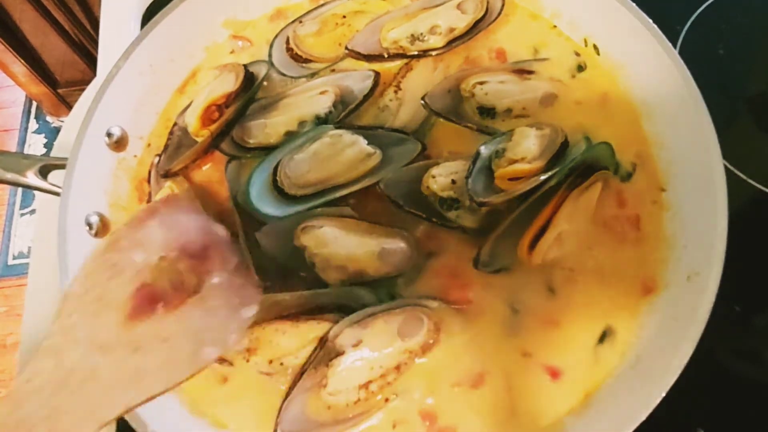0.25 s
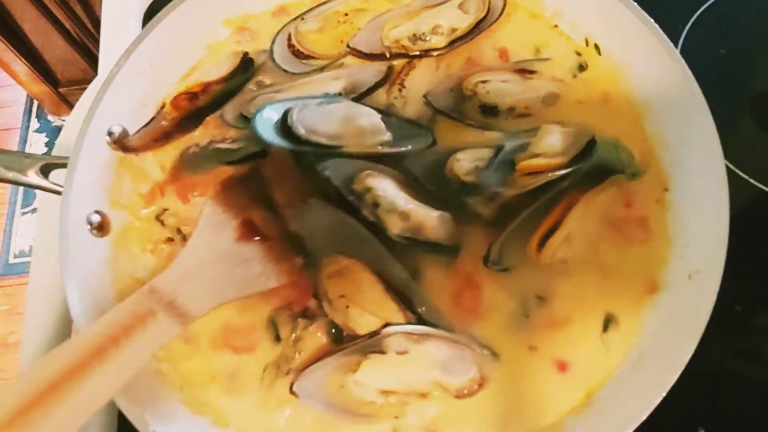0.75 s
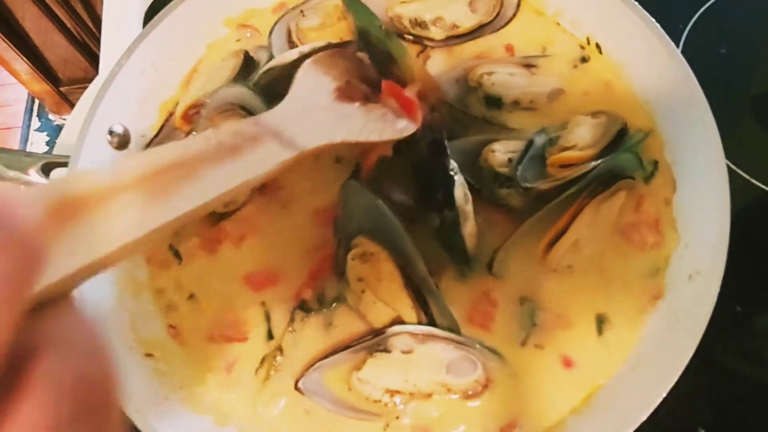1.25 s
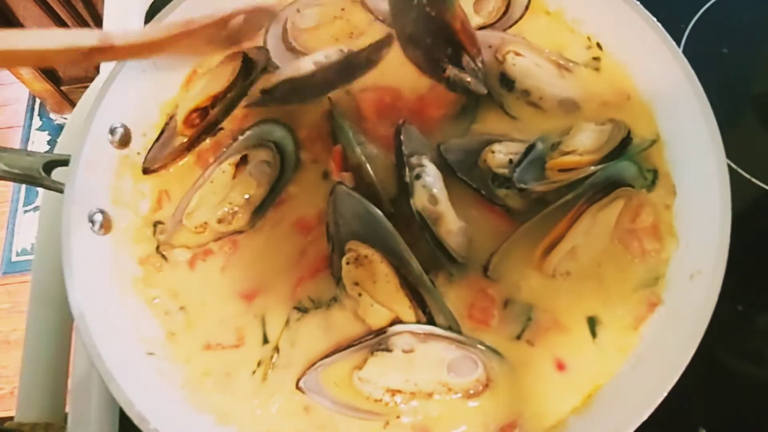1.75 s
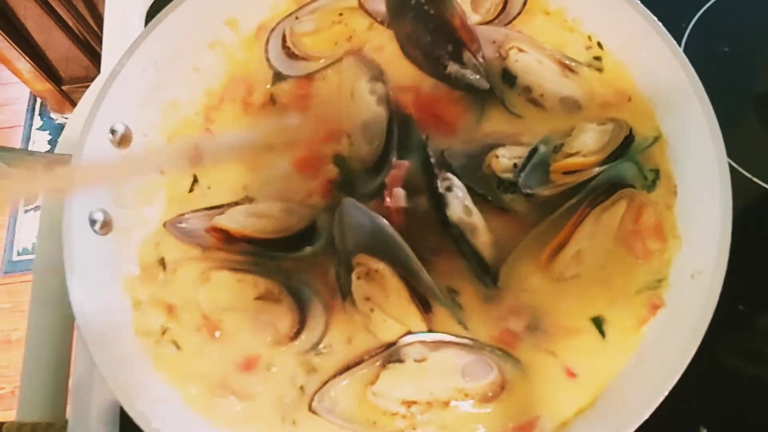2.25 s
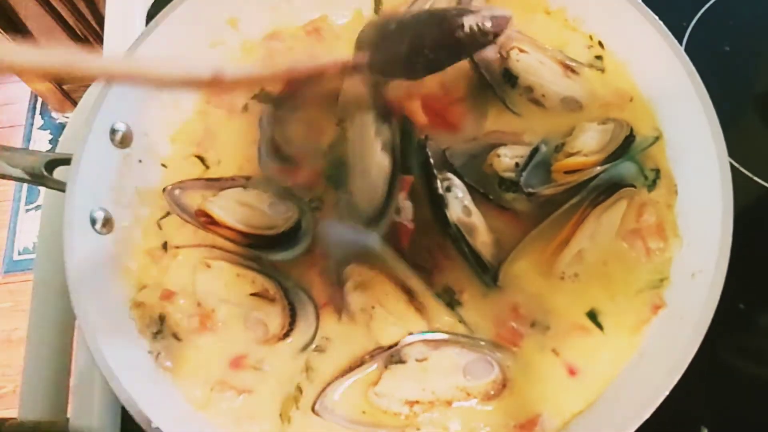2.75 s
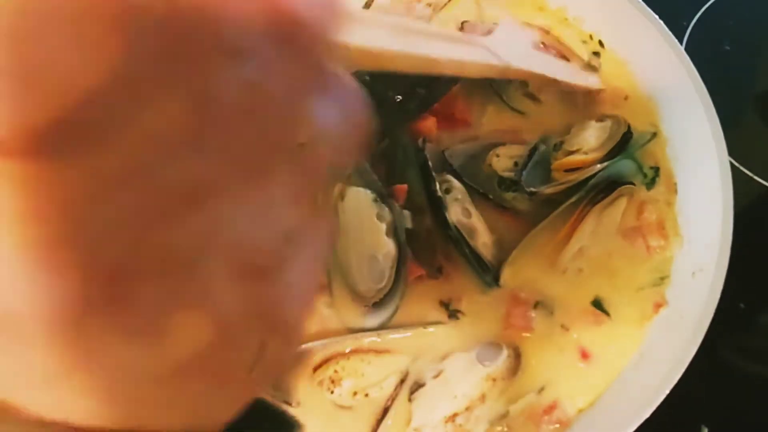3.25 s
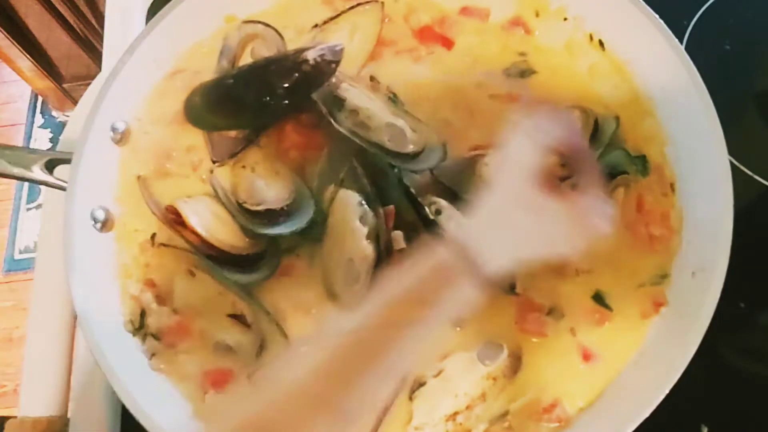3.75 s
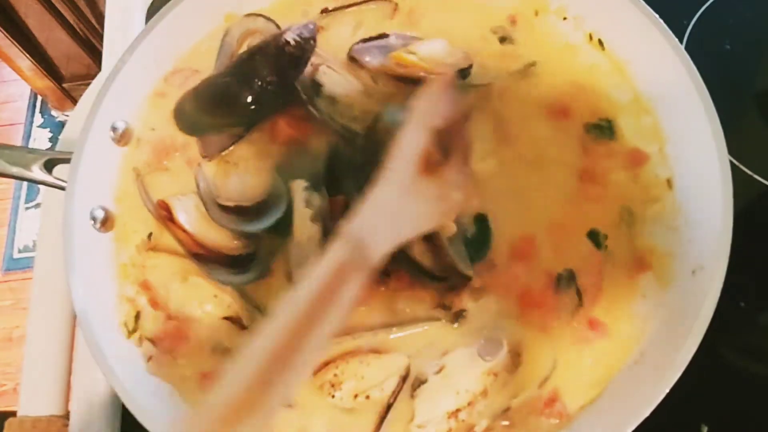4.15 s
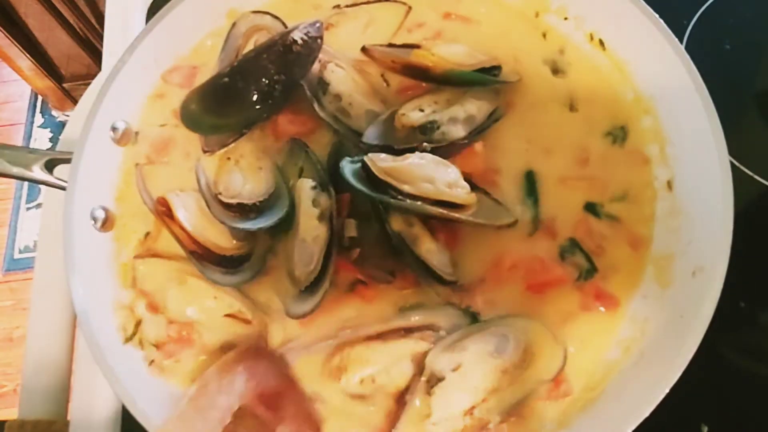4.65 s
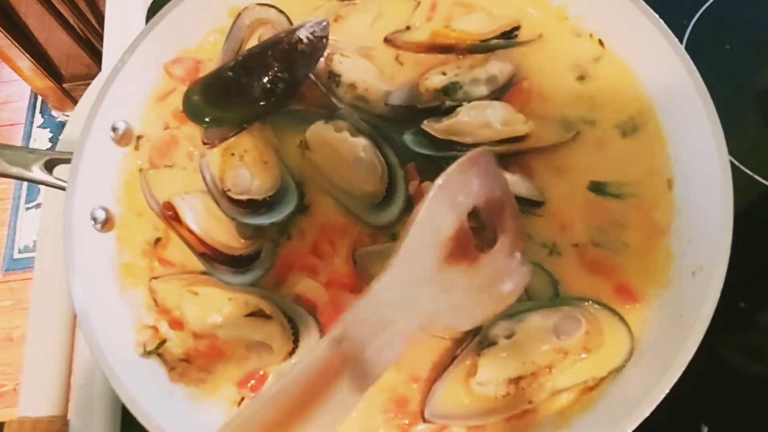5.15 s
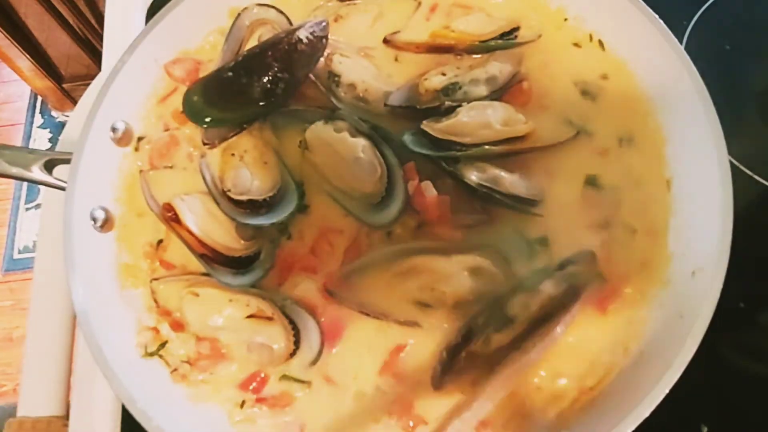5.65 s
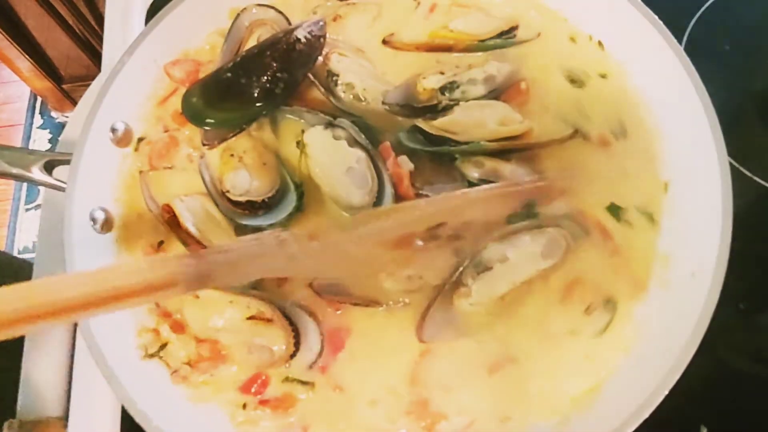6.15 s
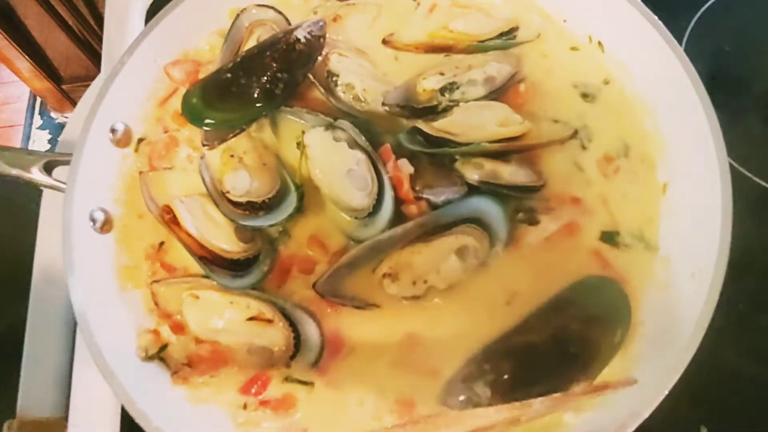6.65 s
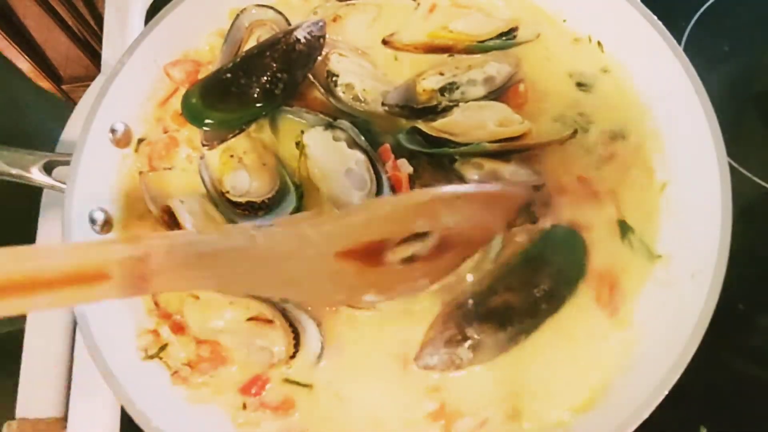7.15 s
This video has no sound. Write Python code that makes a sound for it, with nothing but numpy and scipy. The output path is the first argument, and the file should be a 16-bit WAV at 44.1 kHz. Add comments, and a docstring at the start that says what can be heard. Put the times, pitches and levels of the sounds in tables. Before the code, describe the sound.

Hard shell clicks ring a metal pan, a wooden spatula rasps briefly, and thick broth slops and fizzes while a fan hums quietly in a kitchen.

```python
"""Mussels in creamy broth are stirred with a wooden spatula in a metal pan, over an appliance's hum in a small room.
First comes a burst of shell clacks and knocks that ring the pan; damped modes, struck at once, make both.
At about 1 s and 1.3 s, then longer near 2.7 s, the spatula scrapes, as filtered grains; short rubs follow at 3.4 s.
Quieter touches and thuds go on to the end, with a thin hiss of filtered noise near 7 s.
Throughout, grains and ringing bubbles make the broth slop and fizz in waves."""
import sys
import numpy as np
from scipy import signal
from scipy.fft import rfft, irfft
from scipy.io import wavfile

SR = 44100
rng = np.random.default_rng(int(sys.argv[2]) if len(sys.argv) > 2 else 0)


def write(x):
    x = np.atleast_2d(x).T
    wavfile.write(sys.argv[1], SR, np.round(np.clip(x, -1, 1) * 32767).astype(np.int16))


N = 327222
TIME = np.arange(N) / SR
CUTOFF_HZ = 16000
MIC_LEAD_MS = 0.17   # sound from the pan reaches the left microphone first


def from_db(db):
    """Decibels to gain."""
    return 10 ** (np.asarray(db) / 20)


def rms_one(x):
    """Scale to unit power."""
    return x / np.sqrt(np.mean(x ** 2) + 1e-20)


def in_time(rows):
    """Each column of a curve at every sample."""
    s, *columns = np.transpose(rows)
    return [np.interp(TIME, s, column) for column in columns]


def at_hz(points, hz):
    """Read a table on a log-frequency axis."""
    f, value = np.transpose(points)
    return np.interp(np.log(hz), np.log(f), value)


def add(out, s, sound):
    """Mix a short stereo sound in at time s."""
    start = max(round(s * SR), 0)
    part = sound[:, :max(N - start, 0)]
    out[:, start:start + part.shape[1]] += part


def band_pass(x, low_hz, high_hz):
    """Keep the band between two frequencies."""
    return signal.sosfilt(signal.butter(2, [low_hz, high_hz], "band", fs=SR, output="sos"), x)


def drift(rate):
    """Slow random wander of rms 1, made from noise at a fortieth of the sample rate."""
    pole = np.exp(-80 * np.pi * rate / SR)
    noise = rng.standard_normal(N // 40 + 2002)
    slow = signal.lfilter([1], [1, -2 * pole, pole * pole], noise)[2000:]   # drop the filter's start
    return np.interp(np.arange(N) / 40, np.arange(len(slow)), rms_one(slow))


# how alike left and right are: (frequency [Hz], correlation [0 to 1])
SIDE_LIKENESS = [(40, 0.33), (130, 1), (300, 0.3), (700, 0.36), (2000, 0), (12000, 0.023)]


def coloured(pair, spectrum):
    """Shape two unrelated signals into stereo of rms 1, as alike left to right as the table says."""
    hz = np.maximum(np.fft.rfftfreq(N, 1 / SR), 1)
    alike = np.clip(at_hz(SIDE_LIKENESS, hz), -1, 1)
    mid, side = rfft(pair) * from_db(at_hz(spectrum, hz))
    stereo = np.sqrt(1 + alike) * mid + np.sqrt(1 - alike) * side * [[1], [-1]]
    return rms_one(irfft(stereo, N))


def grains(per_s, spread_db):
    """Two rows of random clicks of scattered size: a few stand out, or fall back if the spread is negative."""
    sizes = from_db(spread_db * np.minimum(rng.exponential(1, (2, N)), 4))
    signs = rng.choice([-1, 1], (2, N))
    present = rng.random((2, N)) < per_s / SR
    return rms_one(sizes * signs * present)


def resonate(x, hz, width_hz):
    """A resonance whose centre may move; rms 1."""
    turn = np.exp(2j * np.pi * np.cumsum(hz * np.ones(x.shape[-1])) / SR)
    ringing = signal.lfilter([1], [1, -np.exp(-np.pi * width_hz / SR)], x / turn)
    return rms_one(np.real(turn * ringing))


def strike(hz, level_db, t60, lead_ms, scatter_db, rise_s):
    """Damped modes struck at once, each reaching the two microphones with its own strength."""
    t = np.arange(int(np.clip(t60.max(), .01, .45) * SR), dtype=np.float32) / SR
    scattered_db = level_db + scatter_db * rng.standard_normal((2, len(hz)))
    gains = from_db(scattered_db) * rng.choice([-1, 1], len(hz))
    turn, loss = np.float32([2 * np.pi * hz, np.log(1000) / t60])[..., None]
    sound = []
    for gain, delay_ms in zip(np.float32(gains), (0, lead_ms)):
        age = np.maximum(t - float(delay_ms) / 1000, 0)
        ringing = gain @ (np.sin(turn * age) * np.exp(-loss * age))
        contact = 1 - np.exp(-age / rise_s)   # the contact takes a moment to build
        sound.append(ringing * contact)
    return np.array(sound) / np.sqrt(np.sum(gains ** 2))


def after(events, t60):
    """A gain kicked up by each event's level that then dies away."""
    kicks = np.zeros(N)
    for s, level_db, *_ in events:
        kicks[round(s * SR)] += from_db(level_db)
    return signal.lfilter([1], [1, -from_db(-60 / (t60 * SR))], kicks + 1e-18)


def stray(motion, db, hz, spread_db, spread_octaves, count):
    """Random small events, likelier where there is more motion: rows (time [s], level [dB], frequency [Hz])."""
    chance = np.cumsum(motion ** 2) / np.sum(motion ** 2)
    times = np.interp((np.arange(count) + rng.random(count)) / count, chance, TIME)
    size, pitch = rng.uniform(-1, 1, (2, count))
    return list(zip(times, db + spread_db * size, hz * 2 ** (spread_octaves * pitch)))


# decay of the room's tail: (frequency [Hz], time to fall 60 dB [s])
ROOM_DECAY = [(100, 0.77), (500, 0.29), (2500, 0.37), (6000, 0.2), (15000, 0.13)]
# tone of the reflections: (frequency [Hz], relative level [dB])
ROOM_TONE = [(100, -5), (400, 6.5), (1500, -4.5), (4000, 0.5), (9000, -6), (16000, 7)]


def kitchen(x, early_db=6.5, early_t60=0.042, gap_s=.002, alike_below_hz=330.0):
    """Quick reflections from pan wall and hob, then the room's tail, band by band; the bass is alike on both sides."""
    t = np.arange(SR // 2) / SR
    edges, echo = np.geomspace(60, 17000, 12), 0
    for low, high in zip(edges, edges[1:]):
        hz = np.sqrt(low * high)
        alike = 1 / (1 + (hz / alike_below_hz) ** 2)
        apart = np.sqrt(1 - alike) * rng.standard_normal((2, len(t)))
        shared = np.sqrt(alike) * rng.standard_normal(len(t))
        noise = band_pass(apart + shared, low, high)
        late = np.exp(-np.log(1000) * t / at_hz(ROOM_DECAY, hz))
        early = from_db(early_db) * np.exp(-np.log(1000) * t / early_t60)
        echo = echo + from_db(at_hz(ROOM_TONE, hz)) * noise * (late + early) * (t > gap_s)
    return signal.fftconvolve(x, rms_one(echo) / np.sqrt(len(t)), axes=1)[:, :N]


# the appliance's air rush: (frequency [Hz], relative density [dB per Hz])
RUSH_TONE = [(20, -50), (35, -44), (52, 2.5), (72, -13.5), (110, 4), (165, -4), (195, -9), (235, 0),
             (330, 0), (400, -8), (520, -8.5), (680, -10), (900, -24), (1500, -28), (3000, -42),
             (6000, -79.5)]
# its motor tones: (frequency [Hz], level before waver and swell [dB rms])
MOTOR_TONES = [(100, -59.5), (118, -65), (168, -61), (235, -65), (292.5, -53.8)]
# slow swell of rush and tones together: (time [s], gain [dB])
APPLIANCE_SWELL = [(0, -3), (1.5, 0), (3.0, 0), (4.5, -1.5), (5.3, -1.5), (6.3, 0.5), (7.42, -1)]
RUSH_DB = -52.0


def appliance(waver_db=2.2, phase_wander=0.39):
    """A fan's low rush as shaped noise, with motor tones that waver in level and phase."""
    rush = from_db(RUSH_DB) * coloured(rng.standard_normal((2, N)), RUSH_TONE)
    side_phase = np.array([[.3], [-.3]])
    tones = 0
    for hz, db in MOTOR_TONES:
        level = from_db(db + waver_db * drift(6.6))
        tones = tones + level * np.sin(2 * np.pi * hz * TIME + phase_wander * drift(3.9) + side_phase)
    swell = from_db(in_time(APPLIANCE_SWELL)[0])
    return (rush + np.sqrt(2) * tones) * swell * from_db([[-.8], [.8]])   # a little to the right


# broth pushed by the spatula: (time of the crest [s], slop level [dB], fizz level [dB],
#                               time to swell by 10 dB [s])
BROTH_WAVES = [(0.03, -57.5, -78.5, 0.84), (0.54, -60, -60, 0.05), (0.68, -57, -62, 0.15),
               (1.14, -54.5, -61.5, 0.65), (1.32, -51, -53.5, 0.03), (1.61, -59, -67, 0.4),
               (2.042, -55.5, -56, 0.14), (2.75, -55, -52, 0.17), (3.44, -57, -59.5, 0.12),
               (3.99, -57.5, -63, 0.18), (4.26, -58, -68.5, 0.06), (4.601, -59, -59, 0.06),
               (4.72, -51, -59, 0.01), (4.861, -60, -62.5, 0.08), (5.019, -54, -58, 0),
               (5.46, -53.5, -52, 0.07), (5.581, -62, -63, 0.24), (5.87, -55.5, -65, 0.01),
               (6.01, -55, -63, 0.14), (6.29, -58, -65, 0.01), (6.41, -61, -64.5, 0.05),
               (6.80, -59.5, -63.5, 0.3), (7.03, -62, -62, 0.24), (7.38, -53, -72.5, 0.09)]
EBB_S, EBB_SHARE = .045, .55   # a wave ebbs by 10 dB in this time plus a share of its swell time
SLOP_LEAD_S = 0.017   # the slop comes just before the fizz
REST_SLOP_DB, REST_FIZZ_DB = -69.0, -83.0   # the broth between waves


def waves():
    """Gain of the slop and of the fizz: every wave swells and ebbs, slow ones more slowly."""
    slop_power, fizz_power = from_db(REST_SLOP_DB) ** 2, from_db(REST_FIZZ_DB) ** 2
    for s, slop_db, fizz_db, swell_s in BROTH_WAVES:
        swell = (s - TIME) / swell_s
        ebb = (TIME - s) / (EBB_S + EBB_SHARE * swell_s)
        power = 10 ** -np.maximum(swell, ebb).clip(0, 10)
        slop_power = slop_power + from_db(slop_db) ** 2 * power
        fizz_power = fizz_power + from_db(fizz_db) ** 2 * power
    return np.interp(TIME + SLOP_LEAD_S, TIME, np.sqrt(slop_power)), np.sqrt(fizz_power)


def bubbles(per_s=100.0, cycles=26.0, count=20):
    """Small bubbles burst in the thick broth; each click rings one of a set of narrow resonances."""
    clicks, dealt = grains(per_s, spread_db=3.5), rng.integers(0, count, N)
    ringing = 0
    for k, hz in enumerate(np.geomspace(420, 2600, count)):
        own_clicks = clicks * (dealt == k) + 1e-18
        ringing = ringing + signal.lfilter(*signal.iirpeak(hz, cycles / 2, fs=SR), own_clicks) / hz
    return rms_one(ringing)


# tone of the slopping liquid: (frequency [Hz], relative density [dB per Hz])
SLOP_TONE = [(300, 17.5), (700, 10.5), (1300, 3.5), (2200, -1.5), (3500, -12), (6000, -26), (9000, -56.5)]
# tone of the fizz on the hot wall: (frequency [Hz], relative density [dB per Hz])
FIZZ_TONE = [(1500, -11), (3000, -3), (5000, -2.5), (7500, -6), (10000, -0.5), (12500, -2), (16000, -7)]
# tone of the steady simmer underneath: (frequency [Hz], relative density [dB per Hz])
SIMMER_TONE = [(2500, -2.5), (5000, -11), (8000, -9.5), (10000, 2), (13000, 7), (16000, 1)]
SIMMER_DB = -77
JOLT_DB, JOLT_T60_S = -28, 0.61   # a knock jolts the broth; level is against the knock


def broth(slop_gain, fizz_gain):
    """Waves and knocks slop the liquid as grains and bubbles; waves fizz too, over a faint steady simmer."""
    slop = coloured(grains(per_s=2500, spread_db=-3.0), SLOP_TONE) * from_db(2.0 * drift(26))
    fizz = coloured(grains(per_s=10000, spread_db=1.5), FIZZ_TONE) * from_db(2.7 * drift(30))
    simmer = coloured(rng.standard_normal((2, N)), SIMMER_TONE)
    motion = np.hypot(slop_gain, from_db(JOLT_DB) * after(PAN_KNOCKS, JOLT_T60_S))
    liquid = motion * (from_db(1.5) * slop + from_db(-6.0) * bubbles())
    return liquid + fizz_gain * fizz + from_db(SIMMER_DB) * simmer


# a thin high hiss, likely steam from under a shell
WHISTLE_S, WHISTLE_LENGTH_S = 6.95, 0.65   # middle and length
WHISTLE_HZ, WHISTLE_WIDTH_HZ, WHISTLE_DB = 13400, 600, -74


def whistle():
    """Noise through a narrow resonance swells and fades."""
    swell = np.sqrt(np.maximum(1 - (2 * (TIME - WHISTLE_S) / WHISTLE_LENGTH_S) ** 2, 0))
    hiss = resonate(rng.standard_normal((2, N)), WHISTLE_HZ, WHISTLE_WIDTH_HZ)
    return from_db(WHISTLE_DB) * swell * hiss


# grit and shell edges catch under the blade and break free in sharp ticks
GRIT_PER_S, GRIT_DB = 110, -5.5   # level is against the rasp
GRIT_LOW_HZ, GRIT_HIGH_HZ = 600, 2300


def grit():
    """Short woody ticks, all kicking the same way, reach the left microphone first."""
    clicks = -np.abs(grains(GRIT_PER_S, spread_db=3.0)[0])
    ticks = rms_one(band_pass(clicks, GRIT_LOW_HZ, GRIT_HIGH_HZ))
    return np.array([ticks, np.interp(TIME - MIC_LEAD_MS / 1000, TIME, ticks)])


# spatula pushed over the bottom: (time of hardest bite [s], time it slides on [s], rasp level [dB],
#                                  rubbing blade level [dB], blade pitch at the bite [Hz])
SPATULA_SCRAPES = [(0.99, 0.075, -46, -58, 1900), (1.315, 0.055, -58, -60, 2200),
                   (2.645, 0.04, -52, -45, 1700), (2.672, 0.05, -37.5, -47, 1500),
                   (2.712, 0.2, -33, -47, 1250), (2.822, 0.025, -52, -43, 1200),
                   (2.892, 0.026, -60, -47.5, 1100), (3.345, 0.03, -56, -58, 1000),
                   (3.376, 0.035, -56, -51, 1150), (3.449, 0.02, -50, -51, 1400),
                   (3.474, 0.03, -49, -53, 1300), (3.52, 0.02, -48.5, -52, 1240)]
# tone of wood on the wet bottom: (frequency [Hz], relative density [dB per Hz])
SCRAPE_TONE = [(180, -10), (300, -5), (403, -13), (703, -7), (869, -10), (1110, -10), (1310, -10.5),
               (1570, -7), (1970, -10.5), (2480, -9.5), (4540, -22), (8190, -35.5), (15000, -51)]
# pressure builds, eases as the blade slides, and lets go
BITE_DB_PER_S, EASE_DB_PER_S, LIFT_DB_PER_S = 380, 89, 480


def scrape(ring_db=-8.0, mode_width_hz=12.0, blade_width_hz=230.0, sag_octaves_per_s=1.9, chatter_db=2.0):
    """Wood sticks and slips: fine slips ring the damped pan, coarse ones the blade, sagging as it dips in."""
    rasp, rub = 0, np.zeros((2, N))
    catches = coloured(grains(per_s=1000, spread_db=2.0), SCRAPE_TONE) * from_db(chatter_db * drift(45))
    for s, slide_s, rasp_db, blade_db, blade_hz in SPATULA_SCRAPES:
        age = TIME - s
        contact_db = BITE_DB_PER_S * np.minimum(age, 0) - LIFT_DB_PER_S * np.maximum(age - slide_s, 0)
        rasp = np.hypot(rasp, from_db(rasp_db + contact_db - EASE_DB_PER_S * np.maximum(age, 0)))
        near = np.abs(age) < .5
        sagging_hz = blade_hz * 2 ** (-sag_octaves_per_s * age[near])
        blade = resonate(catches[:, near], sagging_hz, blade_width_hz)
        rub[:, near] += from_db(blade_db + contact_db[near]) * blade
    slips = coloured(grains(per_s=2000, spread_db=2.5), SCRAPE_TONE) * from_db(1.2 * drift(57))
    body = 0
    for hz, *_ in PAN_MODES:
        if hz > 500:
            body = body + signal.lfilter(*signal.iirpeak(hz, hz / mode_width_hz, fs=SR), slips)
    texture = from_db(-1.5) * slips + from_db(ring_db) * rms_one(body) + from_db(GRIT_DB) * grit()
    return rasp * texture + rub


# wet films snapping between shells: (time [s], level [dB], centre pitch [Hz],
#                                     spread of its pitches [natural log of frequency])
FILM_SMACKS = [(0.4192, -26, 6500, 0.18), (0.681, -35.5, 10650, .15), (0.786, -44, 8950, 0.11),
               (2.345, -47, 7000, 0.29), (2.58, -21, 12400, .13), (3.411, -43, 6800, .25),
               (3.508, -36.5, 10600, .15), (4.1016, -42, 9940, .13), (4.7074, -26, 10300, .28),
               (4.719, -34, 8400, 0.21), (4.759, -35.5, 8100, .1), (4.8025, -43, 6500, .5),
               (4.817, -43, 9000, .08), (4.8649, -41, 10100, .13), (4.9945, -36.5, 9900, .2),
               (5.362, -36.5, 9200, .3), (5.384, -37, 8900, 0.32), (6.792, -44, 10000, .15),
               (6.851, -44, 10000, .3), (6.881, -44, 10500, .08), (6.8904, -40, 10500, 0.18),
               (6.8985, -36, 5600, 0.2), (7.395, -38, 9550, 0.13)]
SMALL_SMACK_DB, SMALL_SMACK_HZ = -47.5, 9800.0   # middle of the random small ones


def smacks(motion, t60=0.0069, small_width=0.13, count=40):
    """A snapping film gives a tiny high tick: a cluster of random, quickly damped pitches."""
    out = np.zeros((2, N))
    ticks = stray(motion, SMALL_SMACK_DB, SMALL_SMACK_HZ, spread_db=1.0, spread_octaves=0.18, count=18)
    small = [(*tick, small_width) for tick in ticks]
    for s, level_db, hz, width in FILM_SMACKS + small:
        pitches = np.minimum(hz * np.exp(width * rng.standard_normal(count)), CUTOFF_HZ)
        smack = strike(pitches, 0, np.full(count, t60), lead_ms=0.1015, scatter_db=1.5, rise_s=0.00015)
        add(out, s, from_db(level_db) * smack)
    return out


# after a knock the pan rocks on the hob in its lowest modes
ROCK_DELAY_S, ROCK_DB, ROCK_BELOW_HZ = .014, -14.5, 87
ROCK_RING = 1.4   # times the mode's own ring time


def rocking():
    """The heavy pan settles on the hob just after each knock, sounding its lowest modes."""
    out = np.zeros((2, N))
    hz, mode_db, t60 = np.transpose([mode for mode in PAN_MODES if mode[0] < 2 * ROCK_BELOW_HZ])
    weight_db = -10 * np.log10(1 + (hz / ROCK_BELOW_HZ) ** 6)
    for s, level_db, low_hz, *_ in PAN_KNOCKS:
        push = 1 / (1 + (low_hz / (2 * ROCK_BELOW_HZ)) ** 2)   # deep thuds move it most
        rock = strike(hz, mode_db + weight_db, t60 * ROCK_RING, lead_ms=MIC_LEAD_MS, scatter_db=1.5,
                      rise_s=0.003)
        add(out, s + ROCK_DELAY_S, push * from_db(level_db + ROCK_DB) * rock)
    return out


# knocks that reach the pan: (time [s], level [dB], lowest frequency excited [Hz], highest frequency excited [Hz],
#                             ring time [share of the free one], mode that the spot favours [Hz])
PAN_KNOCKS = [(0.4216, -19, 296, 5550, 0.88, 4002), (0.4225, -34, 750, 950, .8, 845),
              (0.523, -24, 150, 480, 0.7, 345), (0.5933, -33, 1500, 2500, 1.6, 2038),
              (0.6172, -25, 1150, 4700, 0.85, 4735), (0.682, -28.5, 247, 1370, 0.5, 925),
              (0.9679, -41, 250, 2980, 1.9, 305), (1.030, -31.5, 230, 895, 0.61, 425),
              (1.36, -36.5, 119, 250, 1.7, 148), (1.4049, -34.5, 201, 720, 1.8, 305),
              (1.778, -23, 130, 406, 1.08, 224), (1.7785, -37, 700, 1600, .8, 845),
              (2.0122, -45, 200, 616, 0.76, 305), (2.502, -28, 150, 606, 0.74, 224),
              (2.5129, -24, 109, 900, 0.84, 719), (2.533, -24.5, 110, 300, 0.45, 148),
              (2.7287, -24.5, 220, 2250, 0.5, 719), (3.2113, -31.5, 80, 428, 0.87, 104),
              (3.83, -29.5, 100, 326, 1.46, 148), (4.5568, -34, 130, 395, .6, 224),
              (4.5811, -33.5, 500, 4700, 0.62, 845), (4.7079, -33, 220, 900, 0.5, 305),
              (4.993, -35, 200.5, 704, 0.56, 512), (5.361, -42, 350, 6000, 0.5, 512),
              (5.365, -26, 130, 357, 0.42, 246), (5.386, -39.5, 450, 7000, 0.47, 5660),
              (5.395, -31, 220, 700, .6, 512), (6.2679, -31, 198, 813, 0.2, 305),
              (6.7037, -27, 170, 480, 0.4, 425), (6.747, -32.5, 69.3, 300, 0.53, 246),
              (6.791, -26, 70, 400, 0.62, 104), (7.3399, -38.5, 109, 300, 1, 172)]
# modes of the loaded pan on the hob: (frequency [Hz], relative level [dB], free time to fall 60 dB [s])
PAN_MODES = [(46, -12, .4), (60, -10, .35), (82, -8, .25), (104, -6, .2), (122, -7, .2), (148, -2, .28),
             (172, -8, .15), (224, -3.5, .2), (246, -5, .14), (305, -5, .15), (345, -6, .13),
             (425, -7, .12), (512, -4, .15), (590, -9, .12), (719, -7, .14), (845, -4, .22),
             (925, -10, .13), (1130, -12, .14), (1383, -2, .32), (1540, -14, .16), (1722, -7, .34),
             (1950, -9, .14), (2038, -8, .26), (2335, -14, .16), (2450, -10, .24), (2530, -10, .25),
             (2660, -12, .18), (2905, -13, .2), (3000, -16, .22), (3290, -14, .2), (3370, -11, .2),
             (3600, -16, .2), (3945, -12, .12), (4002, -5.5, .36), (4735, -13.5, .29), (5160, -14, .12),
             (5660, -11, .18), (6585, -11, .15), (7480, -16, .14)]
# between the main modes lies a dense bed of weak ones: dB at 1 kHz, fall in dB per octave, free t60 in s
BED_DB, BED_FALL_DB, BED_T60_S = -17.5, 0.5, 0.21


def pan(contact_cycles=0.24, favour_db=5.5, count=70):
    """Soft wood wakes the low modes, a hard shell edge the high ones; a spatula left in contact damps them."""
    out = np.zeros((2, N))
    bed_hz = np.geomspace(330, 8000, count) * np.exp(rng.uniform(-.02, .02, count))
    bed = [(hz, BED_DB - BED_FALL_DB * np.log2(hz / 1000), BED_T60_S) for hz in bed_hz]
    hz, mode_db, t60 = np.transpose(PAN_MODES + bed)
    for s, level_db, low_hz, high_hz, free, spot_hz in PAN_KNOCKS:
        contact_db = -10 * np.log10((1 + (low_hz / hz) ** 4) * (1 + (hz / high_hz) ** 6))
        # each spot on the pan favours other modes
        nearest = np.argmin(np.abs(hz[:len(PAN_MODES)] - spot_hz))
        favoured = np.arange(len(hz)) == nearest
        spot_db = rng.normal(0, 1, len(hz)) + favour_db * favoured
        # shifting broth detunes the low modes
        load = np.exp(rng.normal(0, 0.013, len(hz)) / (1 + (hz / 700) ** 2))
        knock = strike(hz * load, mode_db + contact_db + spot_db, t60 * free, lead_ms=MIC_LEAD_MS,
                       scatter_db=2.5, rise_s=contact_cycles / high_hz)
        add(out, s, from_db(level_db) * knock)
    return out


# tone of the jostled shells: (frequency [Hz], relative density [dB per Hz])
RATTLE_TONE = [(300, -10), (700, 2), (1800, 4.5), (3200, -3), (5500, -6.5), (9000, -11.5), (15000, -20)]


def rattle(share_db=-36.5, t60=0.36, hard_above_hz=1250.0):
    """A hard clack jostles the neighbouring shells, which settle in a quick run of tiny contacts."""
    hard = [clack for clack in SHELL_CLACKS if clack[2] > hard_above_hz]
    contacts = coloured(grains(per_s=3400, spread_db=2.5), RATTLE_TONE)
    return from_db(share_db) * after(hard, t60) * contacts


# shell against shell or spatula: (time [s], peak level before the mix [dB], main resonance [Hz],
#   fall above it [dB per octave], time to fall 60 dB of modes near it [s], left minus right [dB])
SHELL_CLACKS = [(0.4219, -18.5, 4300, 7, 0.0069, 4), (0.4738, -17.5, 6800, 12, 0.0045, 5),
                (0.4745, -9, 2900, 14, 0.0042, 5), (0.4748, -11, 3800, 16, .005, 5),
                (0.5915, -30.5, 2400, 10, 0.035, -4), (0.6167, -22, 1940, 8.5, 0.026, -1),
                (0.6189, -21.5, 4220, 24, 0.017, -5), (0.653, -28.5, 1300, 11, 0.013, 0),
                (.6815, -28, 850, 8, 0.016, 3), (0.8748, -35, 2900, 26, 0.003, 1),
                (0.8752, -37, 1200, 12, .005, 1), (0.968, -11.5, 4750, 14, 0.008, -0.5),
                (0.9694, -20, 2130, 7, 0.0063, 5), (1.030, -32.5, 1560, 4.5, 0.062, 2),
                (1.231, -41, 1550, 20, .012, 0), (1.3011, -29, 1760, 9, 0.032, 0),
                (1.3591, -31, 2610, 6, 0.018, -2.5), (1.404, -21.5, 1500, 25, 0.0069, -1),
                (1.5772, -26.5, 1370, 6.5, 0.015, 2.5), (1.778, -26, 1080, 14.5, 0.0085, 0),
                (1.868, -42, 1170, 25, 0.025, 1), (2.0119, -31.5, 1040, 14, 0.033, 1),
                (2.0963, -38.5, 1090, 4.5, .02, 1.5), (2.511, -23.5, 790, 3, 0.015, 2),
                (2.5114, -26, 3700, 24, .012, 0), (2.5114, -28, 2400, 22, .06, 0),
                (2.58, -30, 2590, 9.5, 0.036, -3), (2.6845, -26, 1500, 8, .005, 0),
                (2.701, -20.5, 1150, 14, .004, 1), (2.7296, -14, 1000, 11, 0.012, -.5),
                (2.7318, -21, 2100, 20, .008, 0), (2.749, -25, 1500, 10, .006, 0),
                (2.82, -29, 1180, 12, .02, -4), (2.8435, -29.5, 1200, 12.5, .008, -2),
                (3.2115, -31, 1560, 12, 0.0043, 2), (3.3728, -39, 1400, 16, .008, 0),
                (3.3795, -37, 1150, 16, .006, 0), (3.4015, -39, 1300, 12, .006, 0),
                (3.449, -36, 1395, 17, .01, 0), (3.4755, -34, 1400, 9, .003, 0),
                (3.4962, -34, 1300, 9, .003, 0), (3.518, -35, 1400, 9, .004, 0),
                (3.537, -32, 1313, 9, .004, -0.5), (3.8257, -33.5, 900, 18, 0.014, 0),
                (3.9655, -42, 740, 17, 0.028, 3), (4.0069, -41, 1890, 20, .016, 3),
                (4.138, -44, 830, 12.5, 0.027, 3.5), (4.199, -47, 2150, 20, .025, 1),
                (4.255, -39, 2213, 18, 0.025, 1), (4.283, -46, 2400, 12, .015, 1),
                (4.5567, -35, 970, 19, 0.012, 4.5), (4.5812, -29.5, 900, 7, .014, 1),
                (4.5815, -38, 2700, 14, .04, 1), (4.729, -37.5, 1380, 9, 0.016, 1),
                (4.75, -42, 1900, 16, .012, 0), (4.775, -39, 1810, 30, .02, -1),
                (4.9925, -36, 1030, 10.5, 0.019, 5.5), (5.3608, -35, 950, 5, .014, 0),
                (5.3845, -38, 1100, 3, .012, 0), (5.3897, -32, 1600, 18, 0.0058, 0),
                (5.65, -44, 900, 20, .02, 0), (6.2688, -35, 826, 13, .015, 0),
                (6.35, -44, 1200, 16, 0.017, 2), (6.7025, -34.5, 623, 11, 0.013, 3),
                (6.7905, -22.5, 720, 15, 0.014, 1), (6.7915, -33, 1800, 32, .004, -1),
                (6.8517, -38, 1500, 7, 0.006, 1), (7.3396, -34.5, 4600, 14, 0.012, 1),
                (7.3877, -33.5, 875, 26, 0.011, 2)]
# light touches of shells adrift in the moving broth: mean level, mean resonance, fall per octave, t60
TOUCH_DB, TOUCH_HZ, TOUCH_FALL_DB, TOUCH_T60_S = -55.0, 1600.0, 20.5, 0.015


def shells(motion, rise_db=15.0, damping=0.045, treble_floor_db=-42.0, rise_s=0.00013, main_db=8.0,
           main_ring=0.906, count=110):
    """Every shell has one leading resonance amid dense, quickly damped modes."""
    out = np.zeros((2, N))
    strays = stray(motion, TOUCH_DB, TOUCH_HZ, spread_db=7.5, spread_octaves=0.88, count=26)
    touches = [(*touch, TOUCH_FALL_DB, TOUCH_T60_S, 0) for touch in strays]
    for s, peak_db, main_hz, fall_db, t60, pan_db in SHELL_CLACKS + touches:
        hz = np.geomspace(300, 15500, count) * np.exp(rng.uniform(-.015, .015, count))
        octaves = np.log2(hz / main_hz)
        treble_db = np.maximum(-fall_db * octaves, treble_floor_db)
        level_db = np.where(octaves < 0, rise_db * octaves, treble_db)
        rings = t60 * (main_hz / hz) ** damping
        clack = strike(np.append(hz, main_hz), np.append(level_db, main_db), np.append(rings, t60 * main_ring),
                       lead_ms=rng.normal(0.085, 0.075), scatter_db=0.0, rise_s=rise_s)
        clack = clack / np.abs(clack).max(axis=1).mean()   # mean of the two sides' peaks is 1
        side_db = np.array([[pan_db], [-pan_db]]) / 2
        add(out, s, from_db(peak_db + side_db) * clack)
    return out


def scene():
    """Clacks, smacks and knocks sound into the room; rattle, scrape, broth, hiss and hum are mixed in dry."""
    slop_gain, fizz_gain = waves()
    clacks = shells(np.sqrt(slop_gain * fizz_gain)) + smacks(fizz_gain)
    knocks = pan() + rocking()
    wet = kitchen(from_db(-2.5) * clacks + from_db(-10) * knocks)
    struck = from_db(1) * clacks + from_db(-0.5) * knocks + wet
    stirred = rattle() + scrape() + broth(slop_gain, fizz_gain)
    return struck + stirred + whistle() + appliance()


def record(dry, low_cut_hz=48.0):
    """The deep bass and the top are cut."""
    dry = signal.sosfilt(signal.butter(3, low_cut_hz, "high", fs=SR, output="sos"), dry)
    return signal.sosfilt(signal.ellip(10, .1, 80, CUTOFF_HZ, fs=SR, output="sos"), dry)


dry = scene()
out = record(dry)
write(out)
```